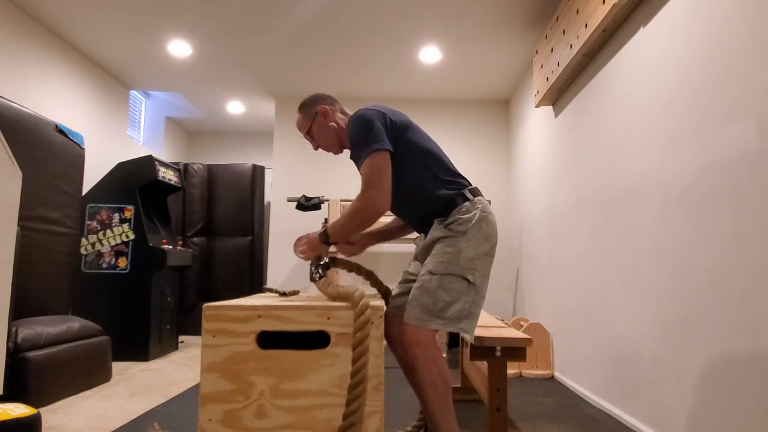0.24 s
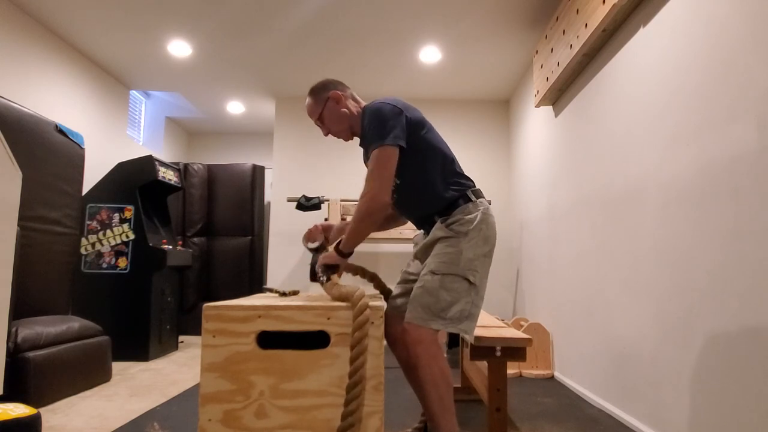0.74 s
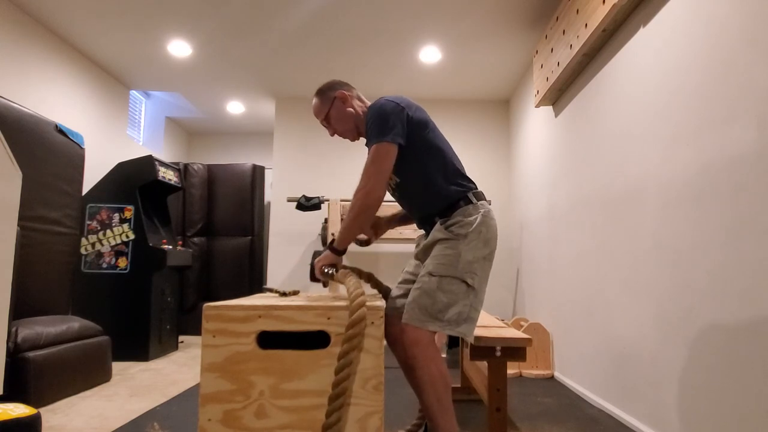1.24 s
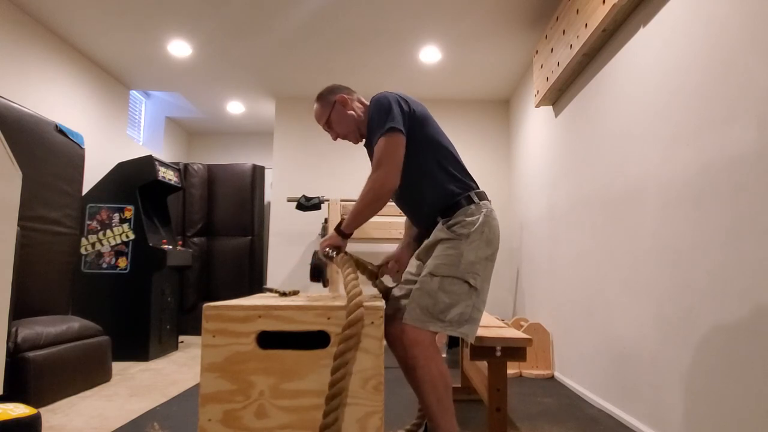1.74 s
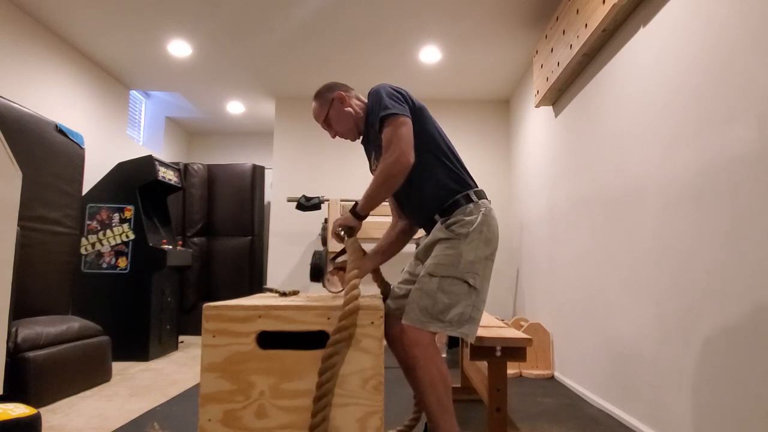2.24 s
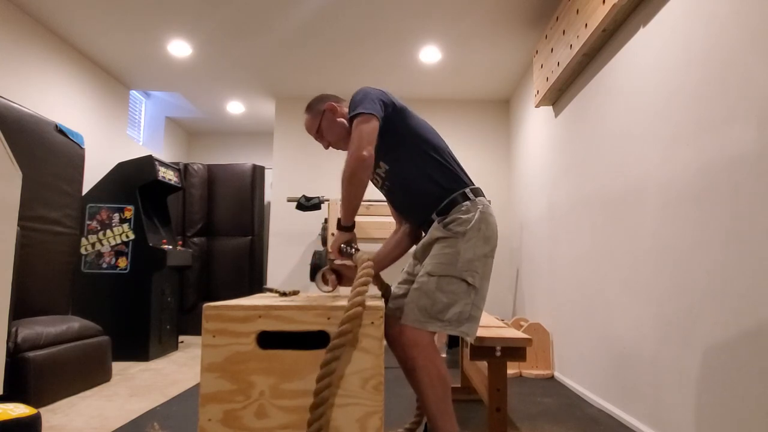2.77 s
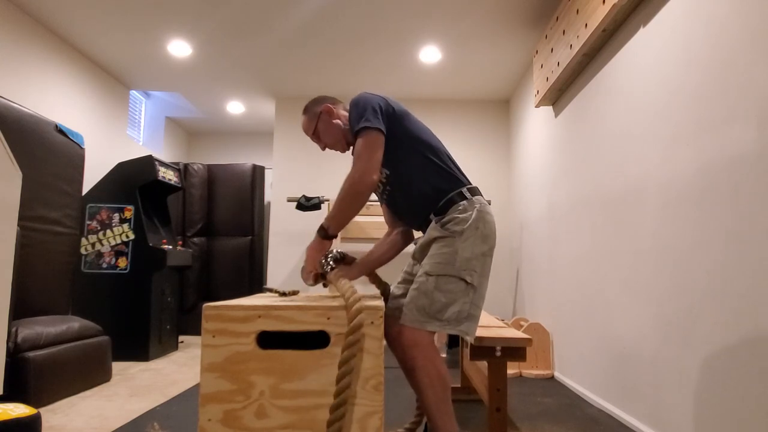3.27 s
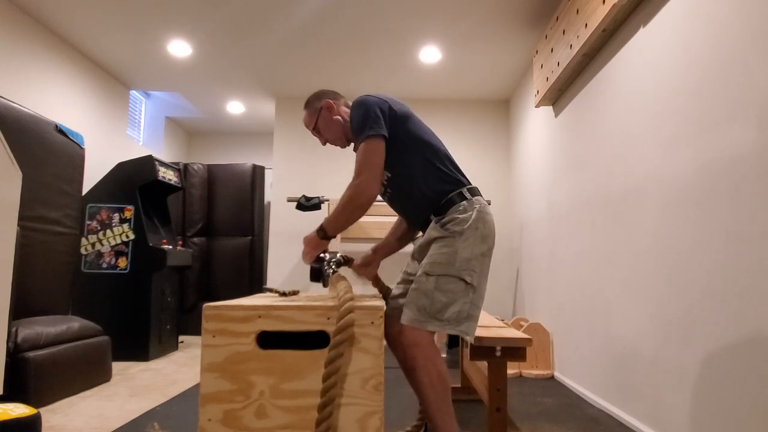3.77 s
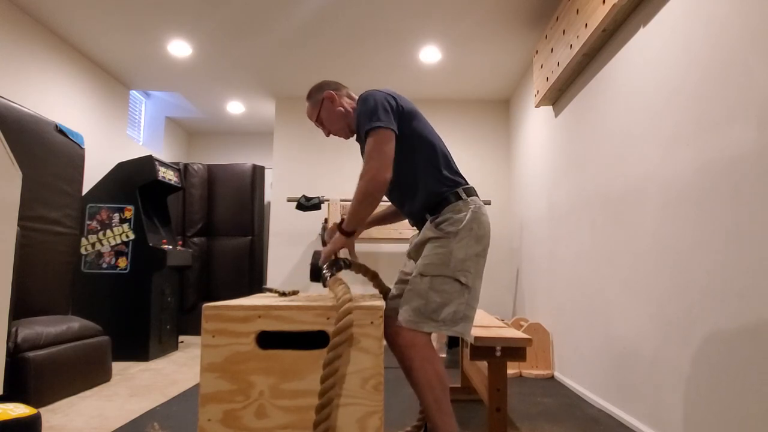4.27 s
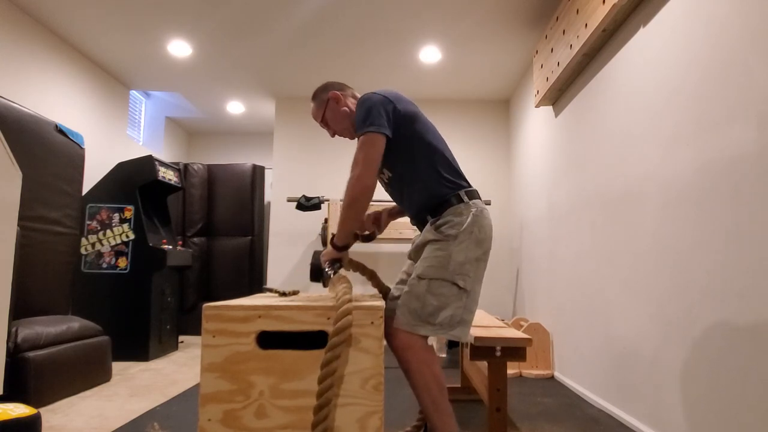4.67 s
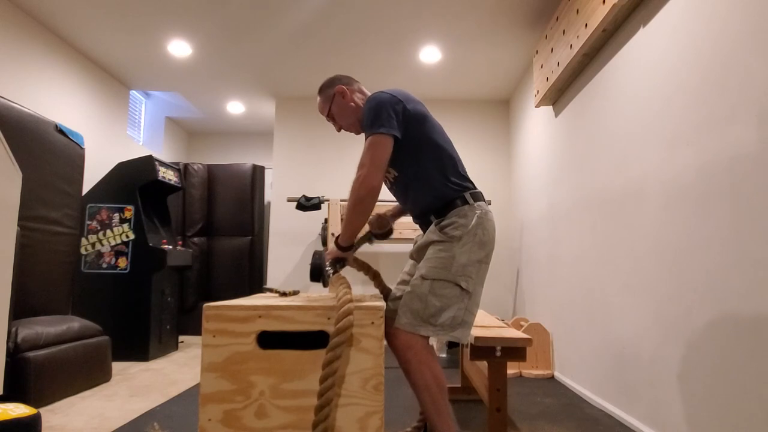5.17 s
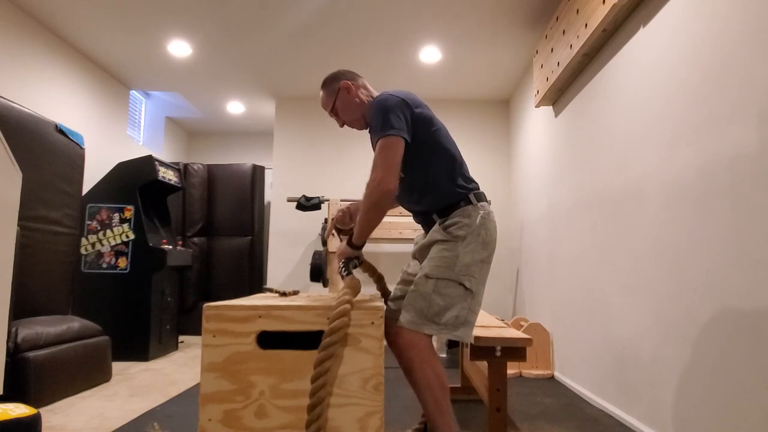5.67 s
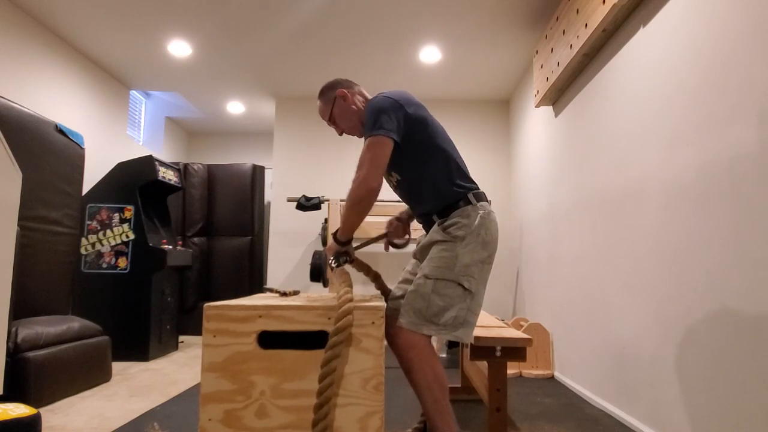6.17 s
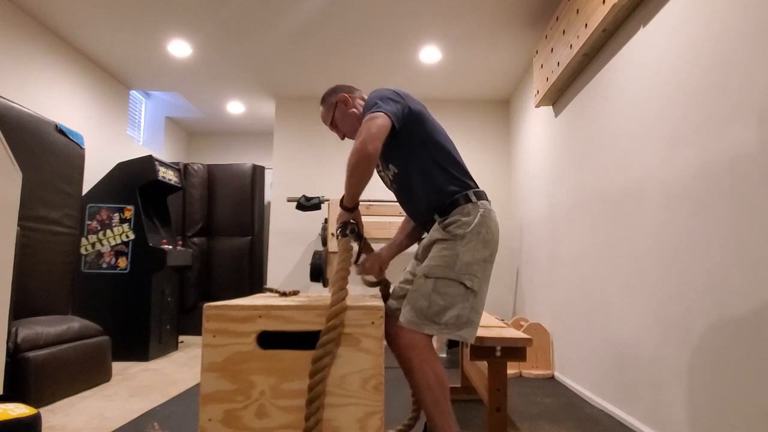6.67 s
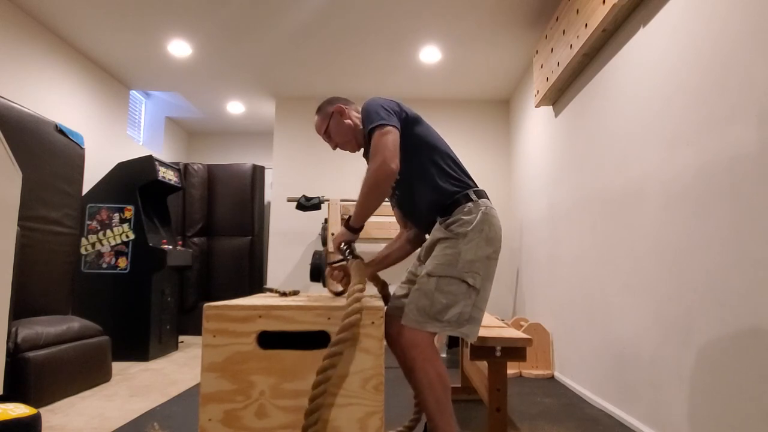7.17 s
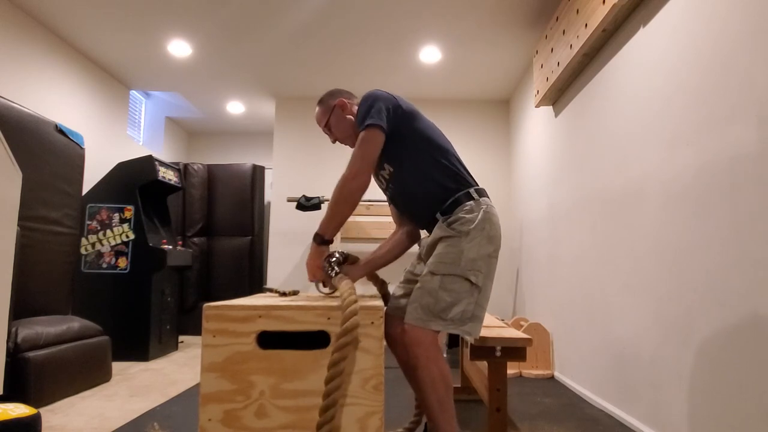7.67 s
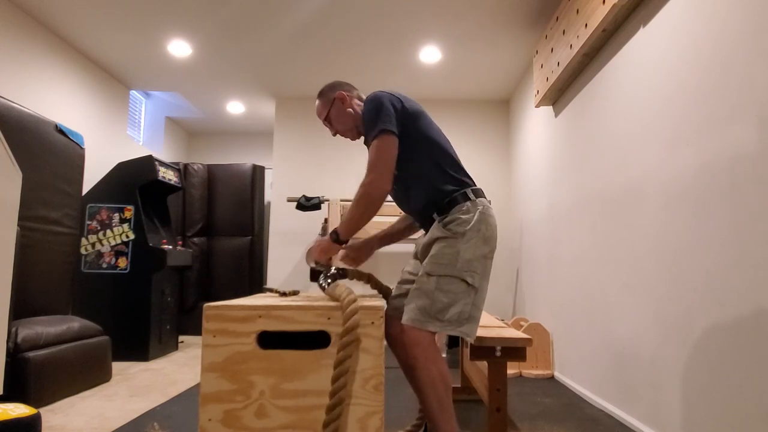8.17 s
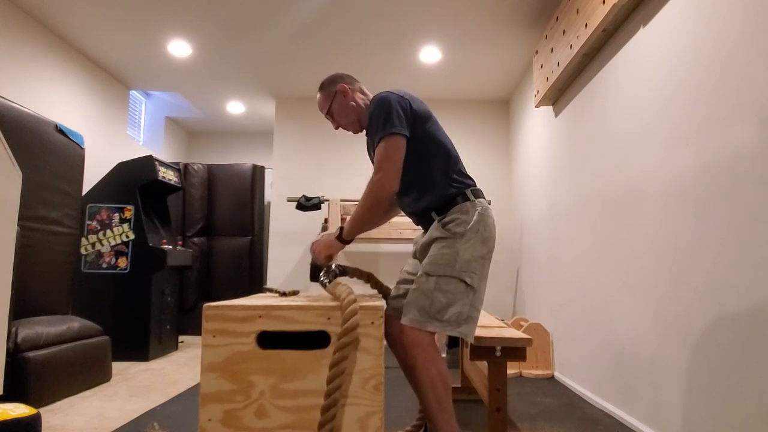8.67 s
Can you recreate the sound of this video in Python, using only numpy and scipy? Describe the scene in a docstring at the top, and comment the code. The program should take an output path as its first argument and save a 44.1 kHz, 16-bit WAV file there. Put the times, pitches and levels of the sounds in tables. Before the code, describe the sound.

Short, harsh rips of sticky tape with sharp cracks, in uneven bursts separated by quiet handling and soft wooden bumps, ringing in a bare hard-walled room.

```python
"""Short, rasping rips of duct tape are heard first, sharp cracks among them, each ringing on between hard walls.
Tape is tugged off its roll and wound round a thick rope on a plywood box in a bare basement gym. Each tug is
a burst of irregular glue slips, and a crack is a line of glue giving way at once; both excite resonances.
Bumps of hands and rope ring the box as a sum of decaying modes. Echoes and a diffuse tail form the room;
a faint crackle of fingers on the glue and a steady hiss lie beneath."""
import sys
import numpy as np
from scipy import signal
from scipy.fft import rfft, irfft, next_fast_len
from scipy.io import wavfile
from scipy.ndimage import uniform_filter1d

SR = 44100
rng = np.random.default_rng(int(sys.argv[2]) if len(sys.argv) > 2 else 0)


def to_wav(sig):
    """Store sig (one row per channel, or 1-D mono) as 16-bit WAV at the path in sys.argv[1].

    Samples outside -1..1 are clipped; the rate is SR.
    """
    pcm = np.clip(np.atleast_2d(sig), -1, 1) * 32767
    pcm = np.round(pcm).astype(np.int16)
    wavfile.write(sys.argv[1], SR, pcm.T)  # frames by channels


N = 393811

# All levels are relative: the filters and gains of each source act on them afterwards.
# tugs on the tape: (t/s, length/s, level/dB, body/dB, sizzle/dB)
TUGS = [(0.013, 0.034, -41, -14, -2.5), (0.426, 0.044, -40.5, -8, -1), (0.525, 0.013, -33.5, -7, 1),
        (0.56, 0.02, -31.5, -7, -3), (0.74, 0.028, -18.5, -17.5, -10), (0.766, 0.024, -17, -1, -2),
        (0.867, 0.016, -15.5, 1.5, -1.5), (0.943, 0.008, -15.5, 2, -1.5), (1.021, 0.01, -15.5, 3.5, -2.5),
        (1.075, 0.018, -21.5, 3, -6.5), (1.155, 0.0058, -10.5, -3.5, -5.5), (1.236, 0.13, -21.5, 2, 0.5),
        (1.451, 0.04, -19.5, 0, 2.5), (1.52, 0.073, -21.5, 0, 3), (1.627, 0.023, -21, -9.5, -2.5),
        (1.77, 0.015, -23, -9, -7), (1.87, 0.011, -23, -20.5, -12), (1.939, 0.012, -18, -16.5, -4),
        (2.031, 0.013, -19, -24, 0), (2.264, 0.018, -15, -31.5, -2), (2.606, 0.071, -54, -23, 0.5),
        (2.73, 0.057, -47, -18, -5), (3.014, 0.038, -52.5, -30, 4.5), (3.045, 0.031, -43, -19, -3),
        (3.101, 0.014, -45, -3, 8), (3.136, 0.21, -57, 0, -5), (3.307, 0.11, -53, -0.5, -3),
        (3.562, 0.063, -30.5, -15.5, -5), (3.665, 0.072, -41.5, 5.5, -3), (4.173, 0.051, -58.5, -10, 10.5),
        (4.35, 0.015, -29, -6.5, 0), (4.418, 0.054, -15, -7.5, -5), (4.475, 0.079, -26.5, 0, 0),
        (4.712, 0.08, -19, -9, -2.5), (5.073, 0.0027, -44.5, -38, 0.5), (5.176, 0.07, -41.5, -10.5, 6),
        (5.252, 0.074, -33, -7, 2.5), (5.509, 0.034, -31, -9.5, 0.5), (5.737, 0.023, -25.5, -11, -4),
        (6.086, 0.017, -16.5, -7.5, -5.5), (6.112, 0.013, -16, 3.5, 1.5), (6.147, 0.043, -20, -5, -7),
        (6.285, 0.0074, -22.5, -14, -12), (6.33, 0.034, -29.5, -9, 6), (6.38, 0.022, -15.5, -19, -1),
        (6.516, 0.011, -16.5, -12, 1.5), (6.559, 0.05, -34, -4, -5), (6.806, 0.011, -18.5, -25.5, -4),
        (7.103, 0.21, -57, -12, -0.5), (7.502, 0.03, -30.5, -16, -3), (7.876, 0.035, -50, -5.5, -2),
        (7.982, 0.082, -56, 1, 3.5), (8.426, 0.011, -42, -19.5, 2.5), (8.616, 0.1, -57, -13, 0),
        (8.654, 0.016, -27, -12.5, -3.5)]
# the backing snaps taut: (t/s, level/dB)
SNAPS = [(0.8683, -8.5), (1.0206, -7), (1.0756, -4), (1.1556, -10.5), (1.2342, -3), (1.351, -14.5),
         (1.4524, -4), (1.6102, -5.5), (1.7725, -16.5), (2.2715, -16), (3.058, -39), (3.109, -36),
         (4.516, -2.5), (4.7143, -11.5), (4.7898, -9.5), (6.0861, -6.5), (6.1448, -1), (6.1789, -0.5),
         (6.2819, -7.5), (6.3793, -11.5), (6.5199, -14), (6.8057, -12), (8.428, -43)]
# short rings of strip and knocked roll, with a squeal and a faint squeak:
# (t/s, length/s, f/Hz, level/dB, overtone level/dB)
SHORT_RINGS = [(0.764, 1.02, 304, 11.5, 4), (2.255, 0.075, 468, 20, -3), (3.656, 0.092, 540, 2, 7.5),
               (3.66, 0.082, 268, 17, 3.5), (4.42, 0.11, 349, -2, 5), (6.381, 0.04, 3900, 4, -21),
               (6.795, 0.05, 447, 12.5, -2.5), (8.287, 0.11, 5400, 22, -8), (8.648, 0.05, 884, 3.5, 4)]
# fingers shift their grip on tape and rope: (t/s, length/s, level/dB)
GRIPS = [(0.297, 0.25, -66.5), (2.407, 0.13, -49.5), (2.994, 1.1, -63.5), (4.2, 0.39, -58),
         (4.95, 1.6, -60), (6.895, 0.19, -57), (7.358, 0.44, -55)]
# hands and rope bump the box: (t/s, level/dB, hardness/dB)
BUMPS = [(0.092, -51.5, -3), (2.529, -59, -20), (3.672, -35.5, -4.5), (5.291, -43, -4), (5.531, -35.5, 0),
         (7.032, -33, -21.5), (7.242, -42, -14), (7.513, -38, -6.5), (7.621, -42.5, -7), (7.785, -39, -18),
         (8.033, -34.5, -11.5), (8.425, -48.5, -10), (8.667, -46.5, -6)]
# spectrum radiated by the peeling tape: (f/Hz, level/dB)
TAPE_SPECTRUM = [(29, -60), (50, -25), (81, -14), (128, -21.5), (189, -10), (313, -8.5), (389, -6),
                 (646, -5.5), (694, -5), (783, -7), (3330, -5.5), (7760, -13.5), (14900, -14), (16000, -14)]
# resonances of the roll: (f/Hz, width/Hz, level/dB)
ROLL_MODES = [(209, 19, 1), (325.4, 24, -4.5), (597, 12, -12), (1000, 16, -1), (1477, 12, -6.5)]
# modes of the plywood box: (f/Hz, level/dB, T60/s)
BOX_MODES = [(54.4, -21, 1), (73, -17, 0.85), (91, -10, 0.18), (124, -14.5, .1), (151, 6, 0.12),
             (188, 0, .2), (274, -12, .1), (317.7, -0.5, 0.18), (386, -6, 0.19)]
# decay of the room: (f/Hz, T60/s)
ROOM_T60 = [(100, 1), (260, 0.5), (700, 0.47), (1840, 0.47), (4850, 0.46), (9000, 0.35), (15000, 0.26)]
# likeness of the diffuse sound at the two microphones: (f/Hz, correlation)
LIKENESS = [(100, .94), (300, .82), (700, 0.39), (1400, 0), (3000, 0.0041), (6000, 0.16), (15000, .0)]
# level difference between the microphones: (f/Hz, left minus right/dB)
LEAN = [(100, 1.5), (400, 1.5), (1300, 3.5), (3000, 1.5), (5500, 7), (9500, -2), (14000, 8)]
# spectrum of the still air: (f/Hz, level/dB)
AIR_SPECTRUM = [(15, -37), (25, -4), (64, -0.5), (463, -1.5), (840, -10), (4140, -13), (6560, 3),
                (7710, -14), (14800, -5), (16000, -5)]
# centres of body, middle, rasp and sizzle in a tug: (f/Hz)
COLOUR_HZ = [330, 1200, 4200, 10500]

SLACK, BUILD_S, RELEASE_S = 0.22, 0.03, 0.0023   # a pull starts this share short, builds up and lets go
MIDDLE_DB, MIDDLE_FOLLOWS = 5, 0.79   # the middle of a tug's spectrum rises and falls with its body
OPENING_CRACK_DB = 2.5   # every tug opens with a small crack, set this far above the tug's table level
OVERTONE = 2.31   # frequency ratio of a short ring's overtone
RING_WIDTH_HZ, BROAD_ABOVE_HZ = 30.0, 1400   # a short ring's bandwidth grows with the square of its pitch
HOLD_DB = -81   # crackle of fingers that merely hold the tape
SETTLE_S, SETTLE_DB = 0.051, -5   # the rope settles with a second, softer bump
AIR_DB = -71.5
CUTOFF_HZ = 16000


def tape(cracks, gain_db=-0.38):
    """Source and resonator: slips and cracks radiate from the strip and excite the roll and short rings."""
    colour = response(TAPE_SPECTRUM, size=4096)
    excitation = tugs() + cracks + rustle()
    dry = signal.fftconvolve(excitation, colour / np.linalg.norm(colour))[:N]
    roll = sum(from_db(db) * resonance(dry, hz, width_hz) for hz, width_hz, db in ROLL_MODES)
    return from_db(gain_db) * (dry + roll + short_rings(dry))


def tugs(slow_per_s=1100, fast_per_s=3600, spread_db=2.5, fizz=0.28,
         clump_db=3.0, clump_s=0.0025, breakaway=1.0, breakaway_s=0.0012):
    """Stick-slip peeling: a harder pull slips more often, and the weave bunches the slips."""
    out = np.zeros(N)
    chance = slip_chance()
    weave = uniform_filter1d(rng.standard_normal(N), max(int(clump_s * SR), 1))
    clumps = from_db(clump_db * rms_one(weave))
    for s, length, db, body_db, sizzle_db in TUGS:
        end = s + length + np.log(100) * RELEASE_S   # the release fades to a hundredth
        span = slice(int(s * SR), int(end * SR))
        per_s = np.interp(db, [-45, -18], [slow_per_s, fast_per_s])
        peel = rms_one(slips(chance[:, span], per_s, spread_db, fizz) * clumps[span])
        t = np.arange(len(peel)) / SR
        # resting glue holds harder, so the first slips are the strongest
        grip = 1 + breakaway * np.exp(-t / breakaway_s)
        force = 1 - SLACK * np.exp(-t / BUILD_S)
        release = np.exp(-np.maximum(t - length, 0) / RELEASE_S)
        pull = rms_one(grip * force) * release
        # the free length and tension of the strip set its colour
        middle_db = MIDDLE_DB + MIDDLE_FOLLOWS * body_db
        strip = response(list(zip(COLOUR_HZ, [body_db, middle_db, 0, sizzle_db])))
        add(out, s, from_db(db) * signal.fftconvolve(peel * pull, strip))
    return out


def slip_chance():
    """Random process behind the slips: waiting chance, size and signed strand noise for each sample."""
    return np.vstack([rng.exponential(1, (2, N)), rng.standard_normal(N)])


def slips(chance, per_s, spread_db, fizz, cracks_per_s=120, crack_share=0.79, crack_hz=6500):
    """Random impulse trains: uneven jerks of the glue, a fizz of strands and rarer thick cracks; rms 1."""
    when, size, strands = chance
    jerks = (when < per_s / SR) * from_db(spread_db * np.minimum(size, 3)) * np.sign(strands)
    cracks = (when < cracks_per_s / SR) * np.sign(strands) * np.sqrt(SR / cracks_per_s)
    high_pass = signal.butter(1, crack_hz, "high", fs=SR, output="sos")
    bright = signal.sosfilt(high_pass, cracks + 1e-18)
    return rms_one(rms_one(jerks) + fizz * strands + crack_share * bright)


def snaps(gain_db=12.0, fade_s=0.00035, edge=0.4, thin_edge=1.0, thin_db=-15, full_db=-7, opening_s=0.001):
    """Impulsive release: a line of glue gives way at once, a sharp crack with a few faint strands after it."""
    out, t = np.zeros(N), np.arange(128) / SR
    cracks = SNAPS + [(s + opening_s, db + OPENING_CRACK_DB) for s, _, db, *_ in TUGS]
    for (s, db), grain in zip(cracks, rng.standard_normal((len(cracks), len(t)))):
        strands = grain * np.exp(-t / fade_s)
        pulse = 0.5 * strands / np.linalg.norm(strands) - (t == 0)
        # weak cracks are thinner: differencing takes more of their bass
        fullness = np.clip((db - thin_db) / max(full_db - thin_db, 1), 0, 1)
        bass_cut = min(thin_edge + fullness * (edge - thin_edge), 1)
        crack = signal.lfilter([1, -bass_cut], [1], pulse)
        add(out, s, from_db(db + gain_db) * crack / np.linalg.norm(crack))
    return out


def short_rings(dry):
    """Driven resonance: for a short while the tape's own sound excites a ring or squeak and an overtone."""
    out, t = np.zeros(N), np.arange(N) / SR
    for s, length, hz, db, overtone_db in SHORT_RINGS:
        drive = dry * ((t > s) & (t < s + length))
        for ring_hz, ring_db in ((hz, db), (OVERTONE * hz, overtone_db)):
            width_hz = RING_WIDTH_HZ * (1 + (ring_hz / BROAD_ABOVE_HZ) ** 2)
            out += from_db(ring_db) * resonance(drive, ring_hz, width_hz)
    return out


def rustle(per_s=500, spread_db=6.0, fizz=0.58, low_hz=1800):
    """Sparse slips under fingers: a faint, thin crackle that swells and fades with each change of grip."""
    high_pass = signal.butter(1, low_hz, "high", fs=SR, output="sos")
    crackle = signal.sosfilt(high_pass, slips(slip_chance(), per_s, spread_db, fizz))
    handling = np.full(N, from_db(HOLD_DB))
    for s, length, db in GRIPS:
        add(handling, s, from_db(db) * np.hanning(int(length * SR)))
    return crackle * handling


def box(ring_db=-9.0, scuff_db=0.0, scuff_s=0.019, scuff_hz=620, scuff_width_hz=900,
        contact_s=0.003, soft_slows=0.47, vary_db=3.0):
    """Modal superposition: a soft bump rings the plywood panels while the rope fibres scuff over the wood."""
    out, t = np.zeros(N), np.arange(SR // 2) / SR
    hz, mode_db, t60 = np.transpose(BOX_MODES)[:, :, None]
    modes = np.sin(2 * np.pi * hz * t) * from_db(mode_db - 60 * t / t60)
    settling = [(s + SETTLE_S, db + SETTLE_DB, hard_db) for s, db, hard_db in BUMPS]
    for s, db, hard_db in BUMPS + settling:
        # every bump excites the modes with new strengths and signs
        strengths = from_db(rng.normal(0, vary_db, len(BOX_MODES)))
        ring = (strengths * rng.choice([-1, 1], len(BOX_MODES))) @ modes
        fibres = rng.standard_normal(len(t))
        for _ in range(2):
            fibres = resonance(fibres, scuff_hz, scuff_width_hz)
        scuff = rms_one(fibres) * np.exp(-t / scuff_s) * from_db(scuff_db + hard_db)
        # a softer contact presses on for longer
        swell = 1 - np.exp(-t / (contact_s * from_db(-soft_slows * hard_db)))
        add(out, s, from_db(db) * (from_db(ring_db) * ring + scuff) * swell)
    return out


def room(x, split_hz=1400, bass_dwell_s=0.16, treble_dwell_s=0.005, count=5):
    """Moving source: the peeling line wanders, and short waves meet new room paths sooner than long ones."""
    t, out = np.arange(N) / SR, 0
    low_pass = signal.butter(2, split_hz, fs=SR, output="sos")
    high_pass = signal.butter(2, split_hz, "high", fs=SR, output="sos")
    bass = signal.sosfilt(np.tile(low_pass, (2, 1)), x + 1e-18)
    treble = signal.sosfilt(np.tile(high_pass, (2, 1)), x + 1e-18)

    def share(dwell_s, spot):
        """Equal-power crossfade: the share of one spot rises for a dwell and falls for the next."""
        return np.sin(np.pi / 2 * np.minimum((t / dwell_s - spot) % count, 2))

    for spot in range(count):
        at_spot = bass * share(bass_dwell_s, spot) + treble * share(treble_dwell_s, spot)
        out = out + signal.oaconvolve(at_spot[None], paths(), axes=1)[:, :N]
    return out


def paths(direct_db=-9.0, wet_db=-2.5, echo_db=-9.0, echo_s=0.0021, build_s=0.00071, count=14):
    """Room impulse response: direct sound, echoes off box, wall and ceiling, a tail that dies band by band."""
    size = 2 ** 15
    t, hz = np.arange(size) / SR, np.fft.rfftfreq(size, 1 / SR)
    field, tail = diffuse(size), 0
    for centre_hz, t60 in ROOM_T60:
        band = at_hz([(f, f == centre_hz) for f, _ in ROOM_T60], hz)
        fade = from_db(-60 * t / t60) * (1 - np.exp(-t / build_s))
        tail = tail + irfft(field * band) * fade / np.linalg.norm(fade)
    echoes = np.zeros((2, size))
    delays_s = rng.uniform(0.0007, 0.022, count)
    bearings = rng.uniform(-1, 1, count)
    for delay_s, bearing, sign in zip(delays_s, bearings, rng.choice([-1, 1], count)):
        # the bearing shifts the arrival oppositely at the two microphones
        arrival = (SR * (delay_s + bearing * np.array([-0.0003, 0.0003]))).astype(int)
        echoes[[0, 1], arrival] += sign * np.exp(-delay_s / echo_s)
    impulse = from_db(wet_db) * tail + from_db(echo_db) * echoes / np.linalg.norm(echoes[0])
    impulse[[0, 1], [0, 2]] += from_db(direct_db)   # the left microphone is a little nearer
    lean = [response([(f, side * db / 2) for f, db in LEAN], size=512) for side in (1, -1)]
    return signal.fftconvolve(impulse, np.array(lean), axes=1)


def air():
    """Stationary diffuse noise: a faint steady hiss under everything."""
    size = next_fast_len(N + N % 2, real=True)
    colour = from_db(at_hz(AIR_SPECTRUM, np.fft.rfftfreq(size, 1 / SR)))
    return from_db(AIR_DB) * rms_one(irfft(diffuse(size) * colour, size)[:, :N])


def diffuse(size):
    """Diffuse field: spectra of two white noises, alike in the bass as sound from all sides is."""
    mid, side = rfft(rng.standard_normal((2, size)))
    alike = np.clip(at_hz(LIKENESS, np.fft.rfftfreq(size, 1 / SR)), -0.99, 0.99)
    return np.sqrt(1 + alike) * mid + np.sqrt(1 - alike) * side * [[1], [-1]]


def resonance(x, hz, width_hz):
    """Damped single mode: a two-pole band-pass with gain 1 on top."""
    r = np.exp(-np.pi * width_hz / SR)
    zeros = np.array([1, 0, -1]) * (1 - r * r) / 2
    poles = [1, -2 * r * np.cos(2 * np.pi * hz / SR), r * r]
    return signal.lfilter(zeros, poles, x + 1e-18)


def response(points, size=2048):
    """Minimum phase: the causal impulse response with the given (f/Hz, level/dB) spectrum."""
    log_gain = np.log(from_db(at_hz(points, np.fft.rfftfreq(size, 1 / SR))))
    cepstrum = irfft(log_gain)
    # folding the cepstrum onto positive times makes the response causal
    cepstrum[1:size // 2] *= 2
    cepstrum[size // 2 + 1:] = 0
    return irfft(np.exp(rfft(cepstrum)))[:size // 2]


def at_hz(points, hz):
    """Logarithmic frequency scale: interpolate a table of (f/Hz, value)."""
    f, value = np.transpose(points)
    return np.interp(np.log(np.maximum(hz, 1)), np.log(f), value)


def from_db(db):
    """Level to amplitude: 20 dB is a factor of ten."""
    return 10 ** (np.asarray(db) / 20)


def rms_one(x):
    """Effective value: scale to rms 1."""
    return x / np.sqrt(np.mean(x ** 2) + 1e-20)


def add(out, s, sound):
    """Superposition: mix a sound in at time s, in seconds."""
    i = max(round(s * SR), 0)
    out[i:i + len(sound)] += sound[:len(out) - i]


def scene(panel_db=-4.0, box_room_db=-6.5, snap_room_db=0.0, snap_beam_db=-16.0, snap_right_db=-4.0):
    """Superposed fields: tape and box sound in the room; front panel and strip also beam at the microphones."""
    thuds, cracks = box(), snaps()
    # the right microphone is a little farther from the strip
    right_cracks = from_db(snap_right_db) * np.roll(cracks, 2)
    beam = from_db(snap_beam_db) * np.array([cracks, right_cracks])
    sources = tape(from_db(snap_room_db) * cracks) + from_db(box_room_db) * thuds
    return room(sources) + beam + from_db(panel_db) * thuds + air()


def record(dry):
    """Band limiting: an elliptic low-pass cuts the top steeply."""
    low_pass = signal.ellip(12, 0.2, 75, CUTOFF_HZ, fs=SR, output="sos")
    return signal.sosfilt(low_pass, dry)


dry = scene()
out = record(dry)
to_wav(out)
```